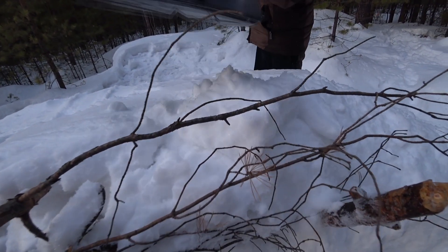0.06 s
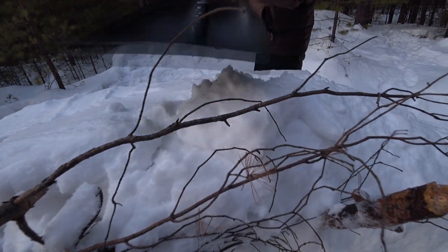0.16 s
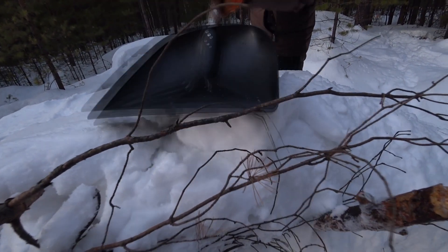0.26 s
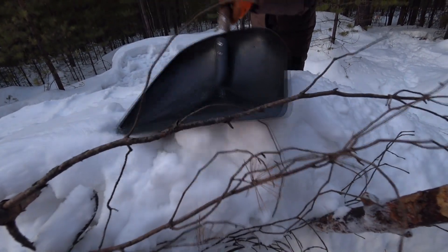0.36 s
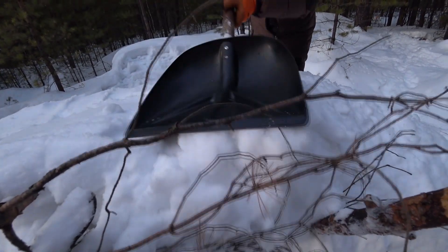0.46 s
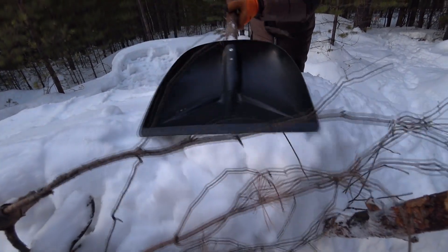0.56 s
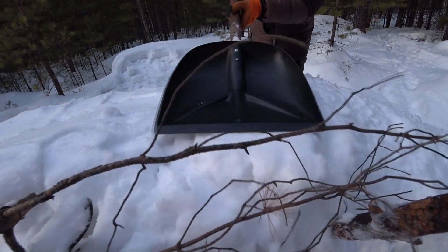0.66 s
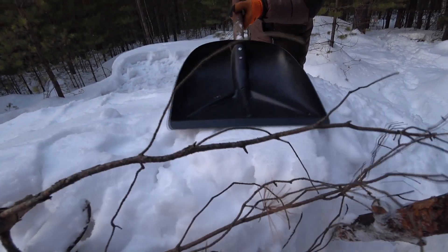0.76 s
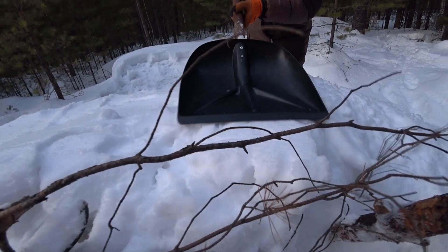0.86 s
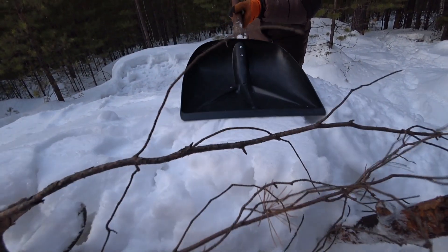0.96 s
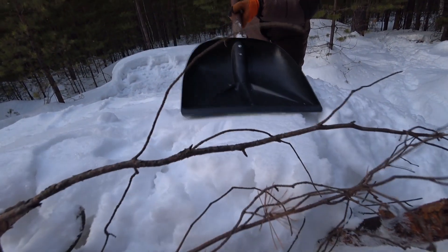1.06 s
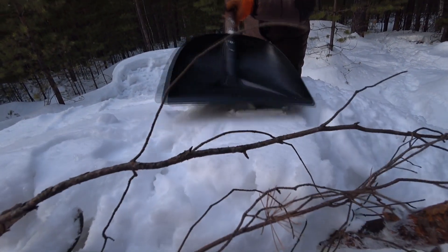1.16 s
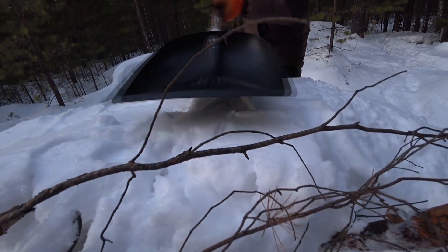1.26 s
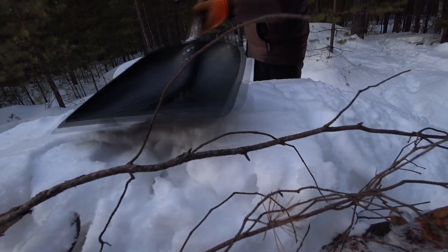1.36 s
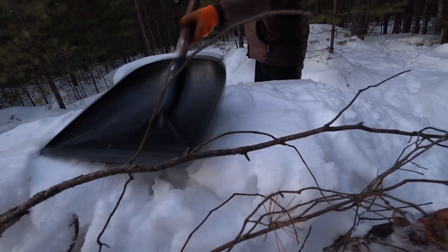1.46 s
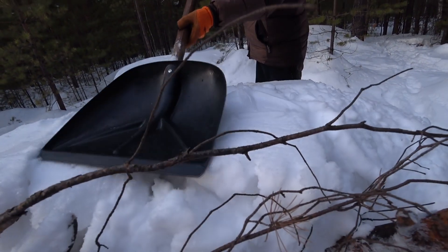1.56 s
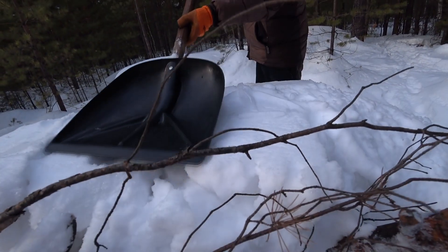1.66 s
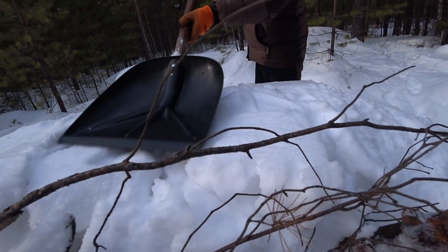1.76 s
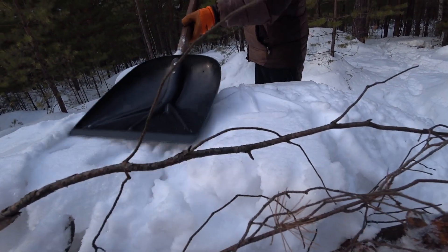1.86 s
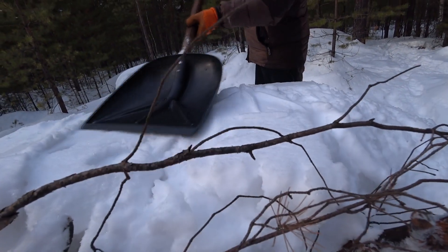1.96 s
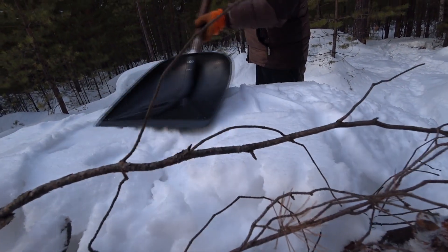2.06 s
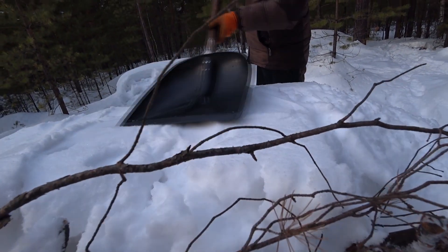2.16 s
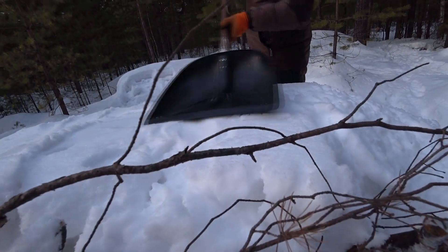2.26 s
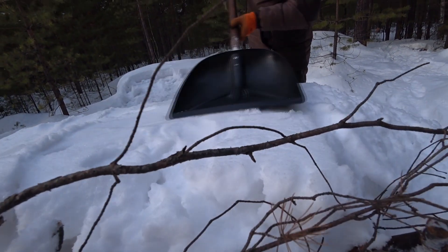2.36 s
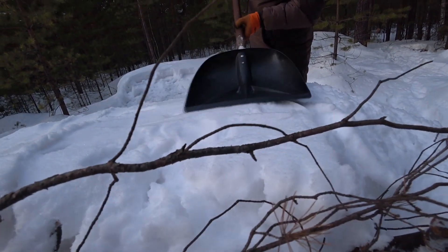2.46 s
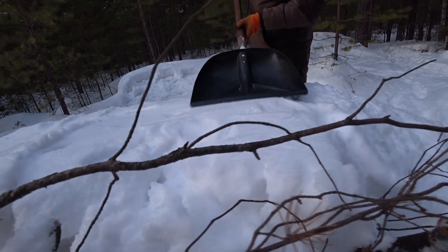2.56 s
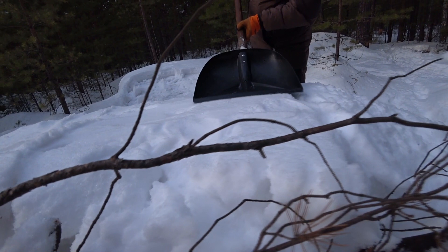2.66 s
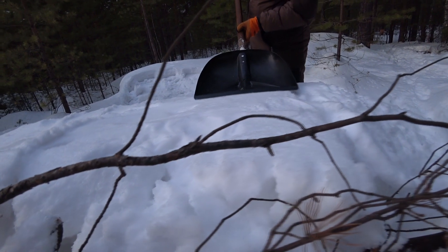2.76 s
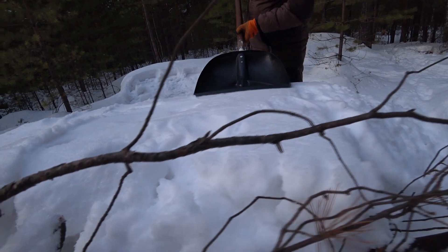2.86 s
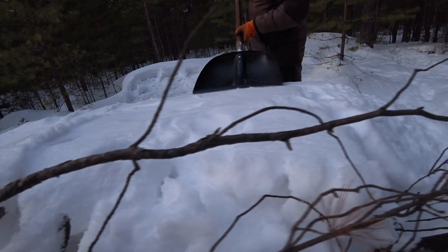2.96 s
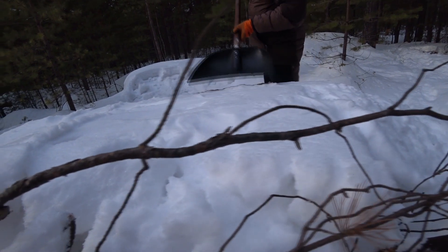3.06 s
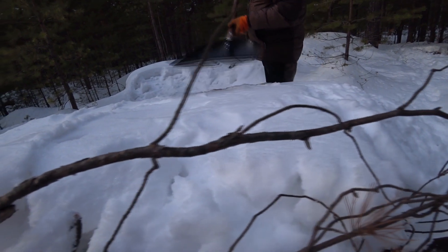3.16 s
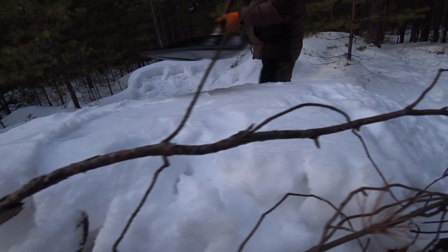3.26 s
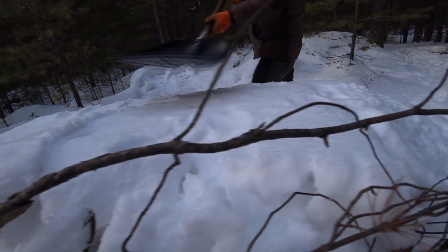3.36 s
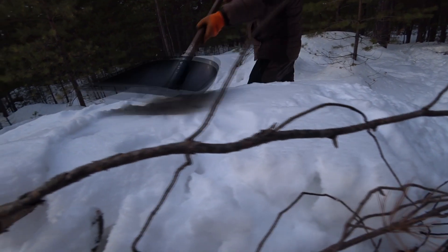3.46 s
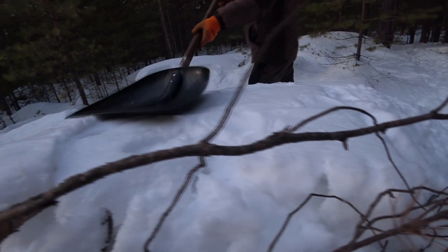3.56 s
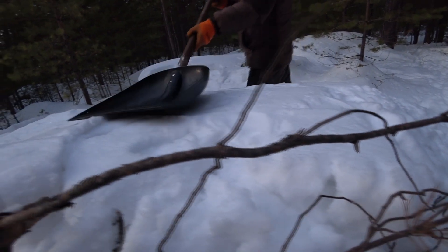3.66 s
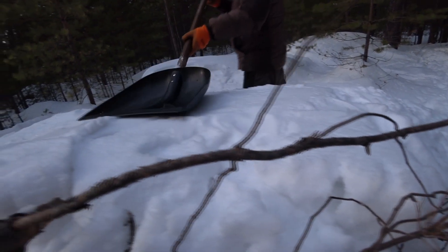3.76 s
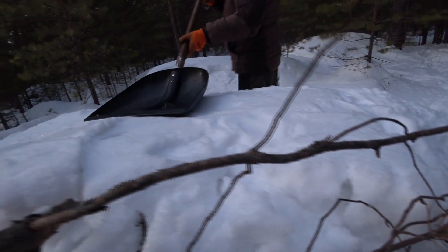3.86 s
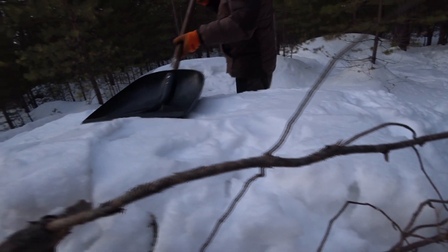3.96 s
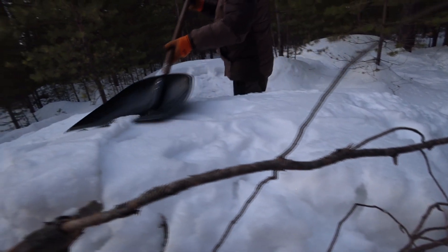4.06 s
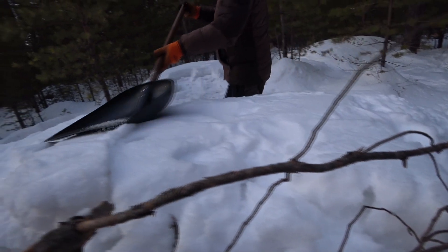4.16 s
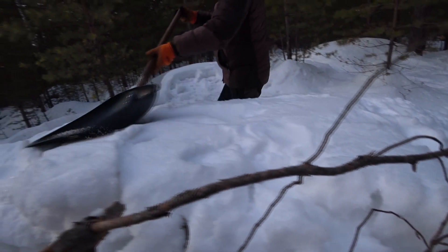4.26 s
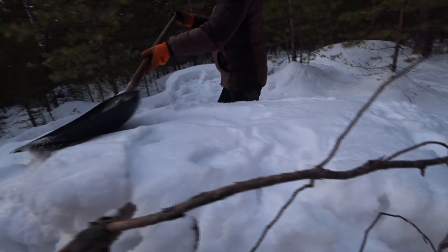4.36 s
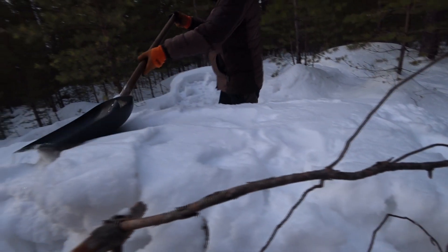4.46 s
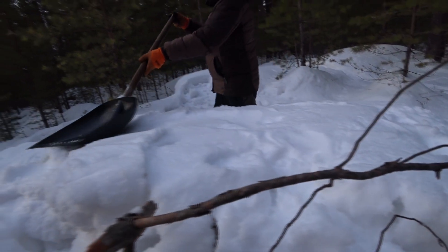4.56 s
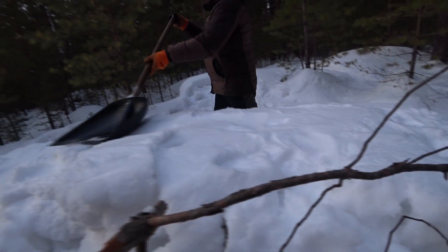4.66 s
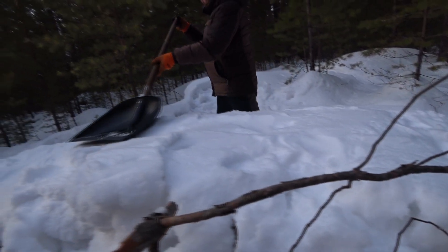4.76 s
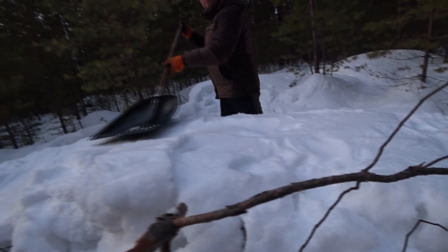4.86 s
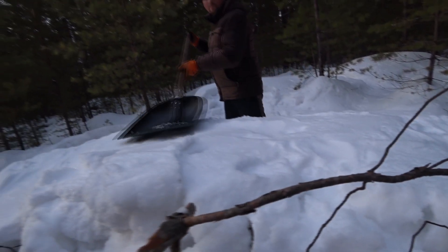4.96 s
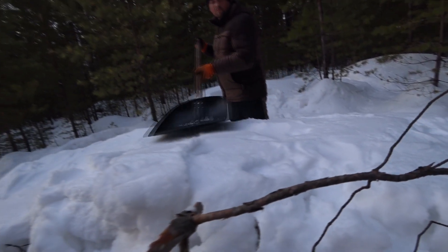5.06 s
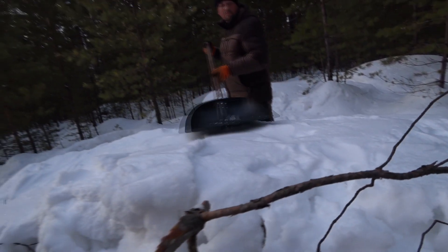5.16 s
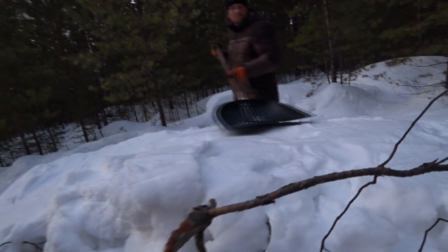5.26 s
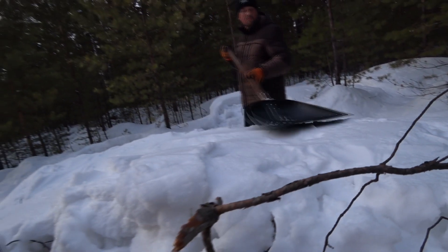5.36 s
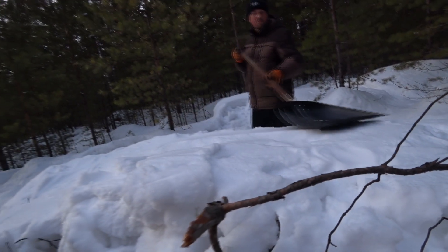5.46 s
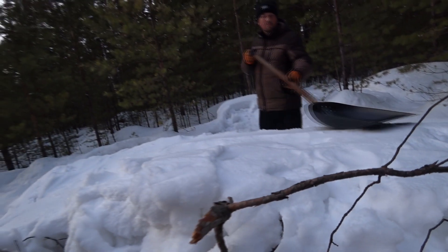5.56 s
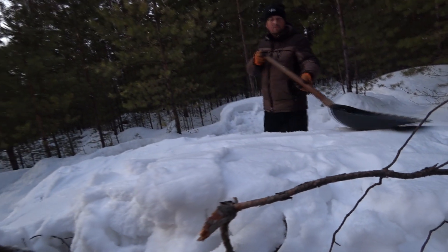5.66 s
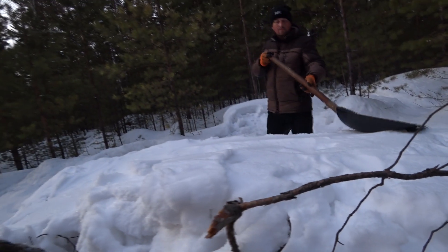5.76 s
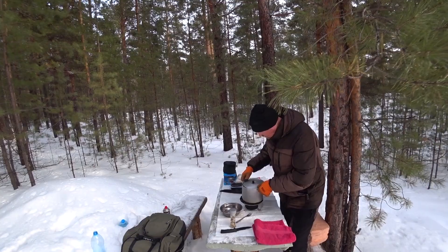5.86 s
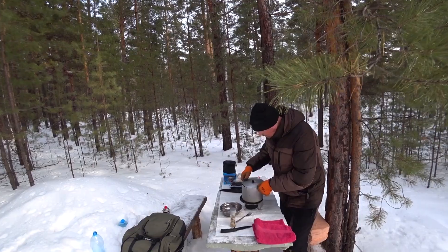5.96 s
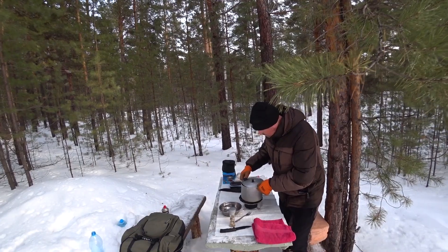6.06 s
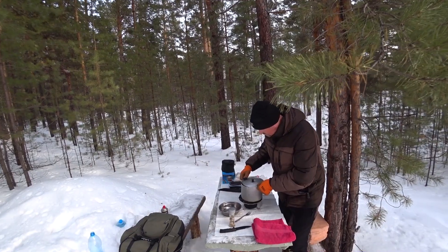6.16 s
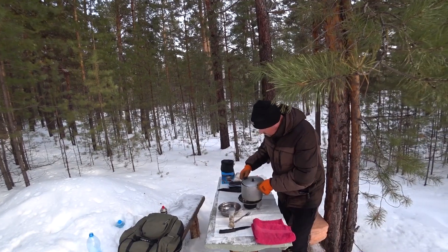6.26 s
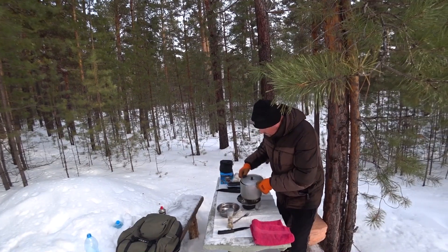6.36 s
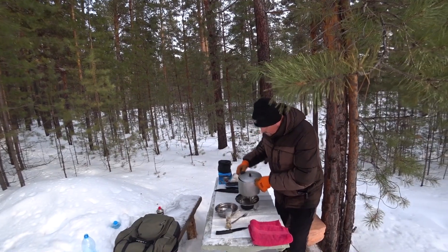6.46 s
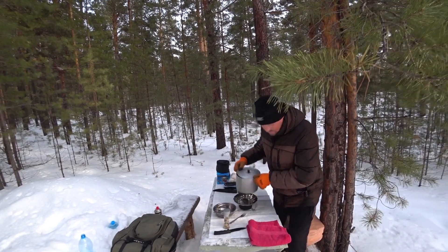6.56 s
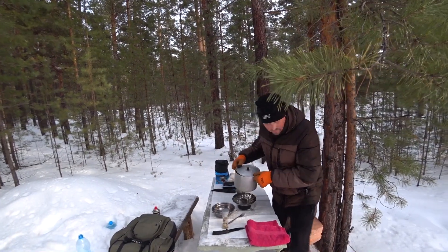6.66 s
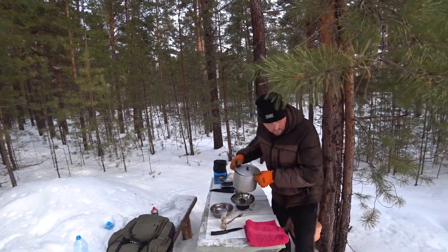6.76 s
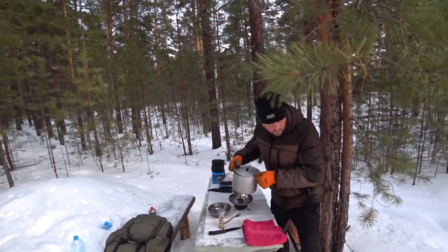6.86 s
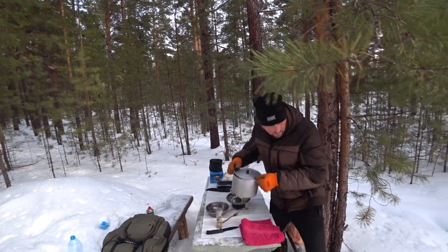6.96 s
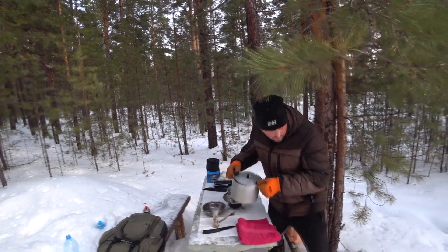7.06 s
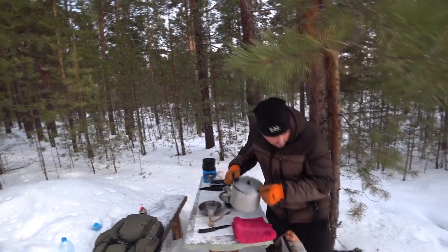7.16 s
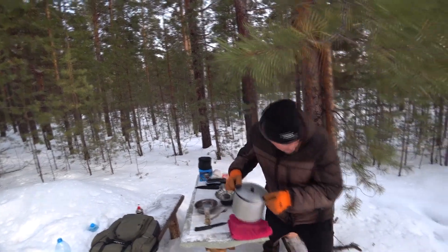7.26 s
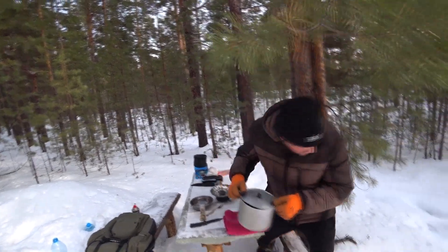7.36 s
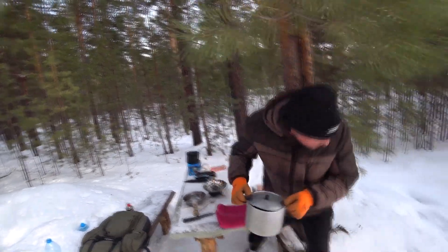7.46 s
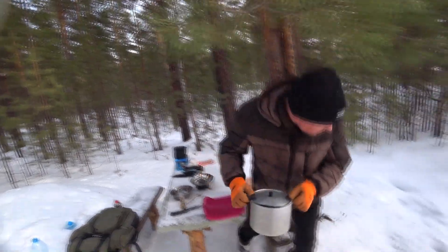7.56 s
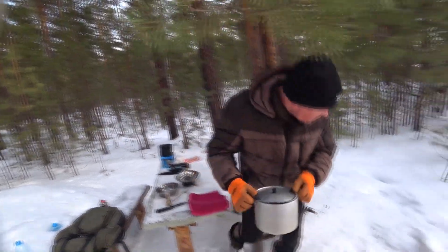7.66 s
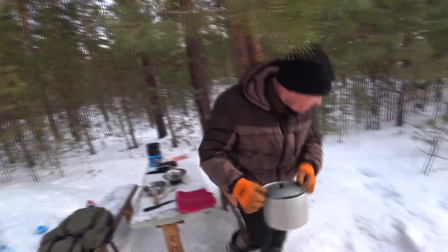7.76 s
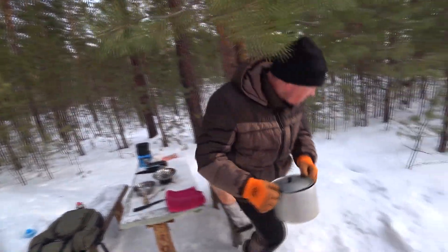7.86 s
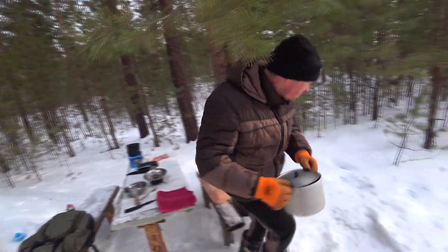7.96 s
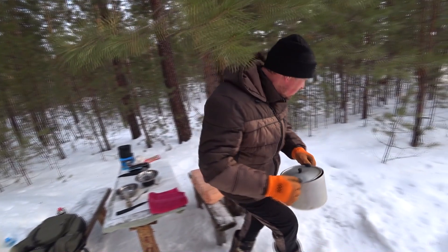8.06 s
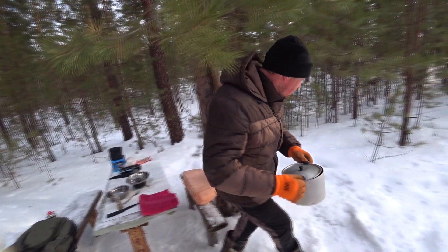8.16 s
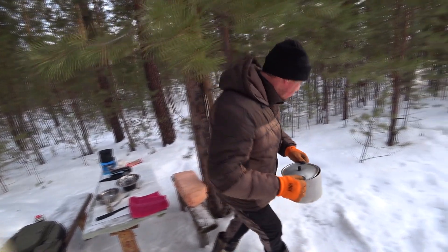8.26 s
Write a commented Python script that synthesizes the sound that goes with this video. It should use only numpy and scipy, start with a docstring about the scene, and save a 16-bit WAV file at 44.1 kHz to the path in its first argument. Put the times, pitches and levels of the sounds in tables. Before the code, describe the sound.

Dry, close stereo outdoor sound over a wide, faint hush. A shovel edge bites packed snow with a loud crunch, scrapes on, lifts with trickling crumbs, then stabs and scrapes twice more, the last stroke lighter. The scene changes to near quiet: soft glove rustle, small dull clinks on a pot, one hollow knock, then several quick crunchy footsteps, with only a trace of reflection from the trees.

```python
"""Snow shovel, then steps at a camp

A plastic shovel chops into packed snow and drags over it; crumbs trickle between strokes.
Tiny random fractures make the snow hiss and the blade rattle; single bigger ones make it knock.
Then, at a quiet forest camp, a pot rings as gloves handle it, and boots crunch through snow.
The background hush is filtered noise; blade and pot are sets of short resonances set ringing by clicks.
"""
import sys
import numpy as np
from scipy import signal
from scipy.fft import rfft, irfft
from scipy.io import wavfile
from scipy.ndimage import uniform_filter1d, map_coordinates

SR = 44100
rng = np.random.default_rng(int(sys.argv[2]) if len(sys.argv) > 2 else 0)


def master(y):
    """Save y as 16-bit WAV."""
    cut = np.clip(np.atleast_2d(y).T, -1, 1)
    pcm = np.round(cut * 32767)  # scale
    wavfile.write(sys.argv[1], SR, pcm.astype(np.int16))


N = 366912

# Levels in the tables are relative: each sound's function sets its overall level.
# background hush: (frequency [Hz], level per Hz [dB])
HUSH_SPECTRUM = [(40, -34), (85, -24), (160, -17.5), (230, -11), (320, -5), (480, -4.5), (1000, 0),
                 (1700, -2.5), (2700, -9.5), (5200, -13.5), (6500, -9.5), (8700, -21.5), (10100, -10.5),
                 (11000, -21)]
# how alike the background hush is at left and right, out of phase in the midrange:
# (frequency [Hz], correlation [-1 to 1])
HUSH_LIKENESS = [(60, .6), (250, 0.13), (500, -0.19), (1000, -0.68), (2000, -0.54), (4000, 0.13),
                 (10000, 0.15)]
# loose snow sliding off the lifted blade: (time [s], hold [s], level [dB])
TRICKLES = [(0.0, 0.011, -42.5), (0.112, 0.12, -51), (1.105, .22, -41.5), (1.378, .05, -48),
            (3.03, .5, -51.5)]
TRICKLE_ATTACK_S, TRICKLE_RELEASE_DB_PER_S = 0.0061, 110
# crumbs on the crust: (frequency [Hz], level per Hz [dB])
CRUMB_SPECTRUM = [(60, -32), (150, -20), (280, -11.5), (800, -26), (2200, -1.5), (4500, 1), (7000, 3.5),
                  (8800, -1), (11000, -3.5)]
# crust giving way under the blade:
# (time [s], knock level [dB], crack level [dB], centre [Hz], base length [s])
BIG_BREAKS = [(0.0557, -54, -30.5, 2730, .0023), (0.199, -45, -44, 600, .002),
              (0.2885, -10.5, -16, 1114, .0035), (0.3233, -18, -22, 1190, .004),
              (0.344, -21, -21, 2420, .006), (0.4232, -15.5, -30, 1140, .003),
              (0.4684, -16.5, -39, 1800, .0014), (0.5015, -17, -29.5, 1900, 0.0014),
              (0.768, -28.5, -32, 1080, 0.0025), (0.813, -24, -37, 1070, 0.0041),
              (0.8753, -30, -27, 1350, .004), (0.972, -26.5, -25, 1260, .0025),
              (1.47, -23.5, -21.5, 1900, .0034), (1.5386, -23.5, -38, 1980, 0.0011),
              (1.771, -23.5, -46, 1230, 0.0026), (1.815, -26.5, -36, 1340, 0.004),
              (2.0964, -27.5, -25, 1530, 0.0076), (2.1476, -22, -33, 1980, .0008),
              (2.1837, -10.5, -19.5, 1500, 0.0019), (2.29, -23, -21.5, 1780, 0.0061),
              (2.32, -22, -25, 1790, .002), (2.3452, -17.5, -22, 1380, .003), (2.491, -28, -36, 2900, .002),
              (2.5306, -16.5, -23, 1580, 0.0019), (2.573, -20.5, -29, 1550, 0.006),
              (2.647, -28, -28.5, 1380, 0.0043), (2.982, -25, -37, 1490, .007),
              (3.036, -44.5, -57, 900, 0.0008), (3.104, -42.5, -63, 930, 0.0013),
              (3.545, -33, -23.5, 2240, .0018), (3.5905, -27, -25.5, 2050, .0007),
              (3.628, -34, -36, 1790, 0.0012), (4.131, -26, -44, 1500, .005), (4.675, -22, -45, 1480, .022),
              (4.867, -30.5, -36, 2110, .005), (5.774, -45, -59, 696, .0027)]
# resonances of the plastic blade: (frequency [Hz], level [dB], time to fall 60 dB [s])
BLADE_MODES = [(243, -4, 0.032), (460, 0, 0.031), (582, -0.5, 0.036), (800, 1, 0.021), (888, 5, 0.012),
               (1140, 0.5, 0.018), (1325, 4, 0.01), (1610, 3.5, 0.015), (2010, 8, 0.0082), (2326, 0, 0.026),
               (3090, -15, 0.0087), (3980, -28, .015)]
# hissing ice crystals: (frequency [Hz], level per Hz [dB])
CRYSTAL_SPECTRUM = [(60, -47), (300, -36.5), (800, -31), (2000, -6.5), (3500, -6.5), (5000, -5), (6500, -3),
                    (7600, -4), (8800, -8), (10800, -6)]
# the three strokes: (time [s], force on the edge [dB], looseness: hiss over rattle [dB])
CHOP_STROKE = [(0.24, -51.5, 14), (0.28, -32.5, -0.5), (0.33, -19.5, -4.5), (0.39, -29.5, 0),
               (0.49, -24.0, -3), (0.64, -32.5, 2), (0.86, -29, -1), (1.03, -35.5, 0.0), (1.11, -49, 5.5)]
SCOOP_STROKE = [(1.58, -44, -2), (1.63, -32.5, 2), (2.07, -33.5, 0.5), (2.19, -28, 3.5),
                (2.35, -23.5, -0.5), (2.46, -34, 1.5), (2.53, -26, -1.5), (2.65, -31, -5.5),
                (2.73, -37.5, 1), (2.83, -29.5, -3.5), (2.99, -32, -6), (3.03, -49, -7)]
DRAG_STROKE = [(3.661, -44.5, -8.5), (3.79, -32.5, 2), (4.07, -37, 2), (4.14, -29, 2.5), (4.34, -36.5, -3),
               (4.46, -32.5, -1), (4.58, -35, -2.5), (4.68, -22.5, -7.0), (4.73, -30.5, -1),
               (4.89, -39.5, 1), (5.04, -36, 8.5), (5.13, -38.0, 4), (5.22, -33.5, 8), (5.69, -39, 1.5),
               (5.75, -50, 1.0), (5.88, -48.5, 2.5), (5.9, -70, -1.0)]
# the edge stabs in before the second and third strokes:
# (time [s], hold [s], force [dB], looseness [dB])
STABS = [(1.462, .075, -24.5, 0.5), (3.533, 0.027, -31.5, 8), (3.587, 0.0097, -33.5, -12)]
STAB_ATTACK_S, STAB_RELEASE_DB_PER_S = 0.0066, 338
# loose snow packs less than firm crust: dB of packing lost per dB of looseness
PACKING_LOSS = 0.1
# snow packing under the edge: (frequency [Hz], level per Hz [dB])
PACKING_SPECTRUM = [(30, -33), (90, -31), (150, -19.5), (220, -10.5), (350, 0.5), (560, 2.5), (700, 4),
                    (1000, -2), (2000, -61), (8000, -75)]
# blade rattle: (frequency [Hz], level per Hz [dB])
RATTLE_SPECTRUM = [(100, -48), (350, -35), (650, -10.5), (900, -4.5), (1300, 1), (1700, 1.5), (2400, -2.5),
                   (3100, -5.5), (4200, -5.5), (11000, -51)]
# small breaks come at random through the strokes; levels are relative to the edge force
CHIPS_PER_S = 11
CHIP_DB, CHIP_CRACK_DB = -2.5, -9
CHIP_CENTRE_HZ, CHIP_BASE_S = 1600, .002
# heavy pushes of blade or boot: (time [s], level [dB], pitch [Hz], time to fall 60 dB [s])
HEAVY_PUSHES = [(0.29, -16, 570, 0.043), (0.291, -39, 232, 0.055), (2.182, -47, 75, 0.028),
                (2.53, -27.5, 545, 0.051), (3.952, -45, 267, 0.016), (7.796, -53, 125, 0.044)]
# crumbs landing, handling ticks and snow snapping under boots:
# (time [s], thud level [dB], crack level [dB], base length [s])
SMALL_SNAPS = [(1.118, -47, -37, 0.0025), (3.297, -47.5, -44.5, .002), (3.391, -47, -45.5, .002),
               (6.068, -51, -70, .0023), (6.111, -51, -70, .003), (6.422, -45, -62, .0013),
               (6.852, -61, -49, .002), (6.921, -50, -42, 0.0022), (7.1916, -31.5, -29.5, .005),
               (7.274, -41, -35.5, 0.0043), (7.4103, -38.5, -40, 0.0022), (7.436, -38.5, -37, 0.0038),
               (7.548, -35, -35, 0.005), (7.5983, -36.5, -43, 0.0048), (7.692, -47, -48, .0014),
               (7.924, -37.5, -43, .003), (7.6461, -27.5, -39.5, 0.0036), (7.797, -29, -31, 0.0028),
               (7.8643, -32, -39, 0.0055), (8.034, -37, -36, .0036), (8.0985, -31, -29.5, .0012),
               (8.1243, -39, -27.5, 0.0016), (8.255, -35, -29, 0.0019)]
# low part of boots and soft handling: (frequency [Hz], level per Hz [dB])
BOOT_SPECTRUM = [(30, -59), (90, -19), (200, -9), (420, -2.5), (800, -0.5), (1250, 1.5), (1900, -2),
                 (3000, -1), (5000, -6), (11000, -24)]
# fine, dry crunch: (frequency [Hz], level per Hz [dB])
CRUNCH_SPECTRUM = [(200, -29), (1000, -16), (2500, -8.5), (4000, -10), (6000, -1.5), (7500, -3.5),
                   (8800, -11), (11000, -13)]
# bands of the camp hum: (centre [Hz], width of one filter pass [Hz], level [dB])
CAMP_BANDS = [(303, 41, -8), (401, 52, -4), (499, 36, 0.5), (755, 320, 3), (923, 77, 4), (1430, 440, 1.5)]
# gloves rubbing on the pot: (time [s], hold [s], level [dB])
GLOVE_RUBS = [(6.4, .04, -44), (6.58, 0.015, -58.5), (6.78, .22, -58), (7.055, 0, -44)]
RUB_ATTACK_S, RUB_RELEASE_DB_PER_S = 0.07, 56
# lid and handles tapping the pot: (time [s], level [dB])
POT_TAPS = [(6.514, -38.5), (6.535, -27.5), (6.577, -47)]
# resonances of the pot, damped by gloves: (frequency [Hz], level [dB], time to fall 60 dB [s])
POT_MODES = [(930, 2, 0.016), (1308, 2, 0.02), (1700, 1, 0.035), (3418, -9, 0.016), (3780, -9, .1),
             (5620, -9, 0.023), (6570, -4, 0.015), (7200, -6, .02)]
# boots pressing the snow: (time [s], hold [s], crunch level [dB], hiss level [dB])
FOOT_PRESSES = [(7.18, 0.047, -38.5, -39), (7.3, 0.0092, -44, -44), (7.358, 0.11, -50, -48.5),
                (7.488, 0.065, -43.5, -39), (7.854, 0.014, -35, -35), (7.915, 0.0059, -39, -37),
                (7.949, 0.012, -46.5, -51), (8.016, 0.13, -38.5, -35.5), (8.18, 0.023, -38.5, -35.5),
                (8.219, .09, -33, -35)]
TREAD_ATTACK_S, TREAD_RELEASE_DB_PER_S = .012, 480
# where shovel and boots are: (time [s], left over right [dB])
POSITIONS = [(0.0, -8), (0.07, -5.5), (0.14, -0.5), (1.13, -2.5), (1.62, 1.5), (2.73, -2), (4.7, 3.5),
             (5.65, -5), (5.88, -7), (5.93, -4.5), (7.16, 1.5), (7.21, -4), (7.37, -1.5), (8.32, -2)]
LEAD_S = .012  # how long fractures gather before a snap
CEILING = .88  # loudest sample the recorder can take
TOP_HZ = 11080  # upper band limit of the recorder


def amp(db):
    """Turn decibels into a gain."""
    return np.exp(np.asarray(db) * (np.log(10) / 20))


def unit(x):
    """Scale x to an average strength (rms) of 1."""
    return x / np.sqrt(np.mean(x ** 2) + 1e-20)


def blow(x):
    """Give a short sound the energy of 10 ms at rms 1."""
    return x / np.linalg.norm(x) * np.sqrt(SR / 100)


def add(track, s, sound):
    """Mix a sound into the track at time s."""
    part = track[max(round(s * SR), 0):][:len(sound)]
    part += sound[:len(part)]


def along(points, hz):
    """Read (Hz, value) points on a log frequency axis."""
    f, v = np.transpose(points)
    return np.interp(np.log(hz + 1), np.log(f), v)


def wobble(rate):
    """Draw a smooth random curve through a given number of knots a second."""
    step = 16  # samples between computed points
    coarse = np.arange(0, N + step, step)
    knots = rng.standard_normal(N // 60)
    curve = map_coordinates(knots, [coarse * rate / SR], order=2, mode="wrap")
    return np.interp(np.arange(N), coarse, curve)


def swell(s, attack, hold, release_db_per_s):
    """Shape a level from time s: rise, hold, then a steady fall in dB."""
    track, t = np.zeros(N), np.arange(SR) / SR
    rise = np.clip(t / attack, 0, 1)
    fall = amp(-release_db_per_s * np.maximum(t - attack - hold, 0))
    add(track, s, rise * fall)
    return track


def colour(x, spectrum):
    """Filter x to a spectrum, with no sound before a click, so clicks keep their sharp fronts."""
    size = 4096
    # folding the cepstrum forward in time gives a minimum-phase filter
    cepstrum = irfft(np.log(amp(along(spectrum, np.fft.rfftfreq(size, 1 / SR)))))
    cepstrum[1:size // 2] *= 2
    cepstrum[size // 2 + 1:] = 0
    response = irfft(np.exp(rfft(cepstrum)))
    return signal.oaconvolve(x, response)[:len(x)]


def focus(x, hz, q):
    """Pass x through one resonance at hz; a higher q is sharper."""
    return signal.lfilter(*signal.iirpeak(hz, max(q, .3), SR), x)


def grit(rate, spread_db, size=N):
    """Make tiny fractures: random clicks, rate a second, of widely spread sizes."""
    hits = np.flatnonzero(rng.random(size) < rate / SR)
    spread, sign = rng.standard_normal((2, len(hits)))
    track = np.zeros(size)
    track[hits] = amp(spread_db * np.clip(spread, -2, 2)) * np.sign(sign)
    return unit(track)


def patchy(x, depth_db):
    """Shift the colour from moment to moment as the contact moves."""
    z = signal.stft(x, nperseg=512)[2]
    field = uniform_filter1d(rng.standard_normal(z.shape), size=6, axis=0)
    field = uniform_filter1d(field, size=10, axis=1)
    return unit(signal.istft(z * amp(depth_db * unit(field)))[1][:N])


def burst(length, rate, snap=1):
    """Fractures gather for a moment, peak in a snap at LEAD_S and die away."""
    t = np.arange(SR // 10) / SR - LEAD_S
    u = t / max(length, .0005)
    run = grit(rate, spread_db=1.0, size=len(t)) * np.exp(-np.maximum(u, -2.5 * u))
    click = np.arange(len(t)) == round(LEAD_S * SR)
    return run / (np.linalg.norm(run) + 1e-9) + snap * click


def background_hush(level_db=-48.0):
    """A wide, nearly steady hush is filtered noise, its midrange partly opposite in phase left and right."""
    hz = np.fft.rfftfreq(N, 1 / SR)
    turn = np.arccos(np.clip(along(HUSH_LIKENESS, hz), -1, 1)) / 2
    noise = rfft(rng.standard_normal((2, N))) * amp(along(HUSH_SPECTRUM, hz))
    mid, side = irfft(noise * [np.cos(turn), np.sin(turn)], N)
    hush = unit(np.array([mid + side, mid - side]))
    return amp(level_db + 0.61 * wobble(5)) * hush * amp([[-1], [1]])


def trickle(level_db=-1):
    """Loose crystals patter down on the crust as many small clicks."""
    patter = grit(7000, spread_db=7.0) * amp(0.6 * wobble(76))
    flow = sum(amp(db) * swell(s, TRICKLE_ATTACK_S, hold, TRICKLE_RELEASE_DB_PER_S)
               for s, hold, db in TRICKLES)
    return amp(level_db) * flow * unit(colour(patter, CRUMB_SPECTRUM))


def blade(x, weights_db):
    """The blade's resonances answer x; the contact point gives each a weight."""
    out = 0
    for (hz, db, t60), weight_db in zip(BLADE_MODES, weights_db):
        q = np.pi * hz * t60 / np.log(1000)
        out = out + amp(db + weight_db) * t60 * focus(x, hz, q)
    return out


def breaks(rows, knock_db=-0.5, crack_db=2.5, focus_q=3.26):
    """A fracture cracks and kicks the blade, which rings briefly."""
    track = np.zeros(N)
    for s, low_db, high_db, hz, length in rows:
        kick = burst(1.46 * length, rate=9900, snap=0.53)
        ring = blade(kick, rng.normal(0, 2.1, len(BLADE_MODES)))
        knock = blow(focus(ring, hz, focus_q))
        crack = blow(colour(burst(1.1 * length, rate=18000, snap=0.031), CRYSTAL_SPECTRUM))
        both = amp(low_db + knock_db) * knock + amp(high_db + crack_db) * crack
        add(track, s - LEAD_S, both)
    return track


def stroke(rows, fade=0.018):
    """Draw a stroke's force (a gain, zero outside it) and looseness (dB) over time."""
    t = np.arange(N) / SR
    s, force_db, loose_db = np.transpose(rows)
    gate = np.clip(np.minimum(t - s[0], s[-1] - t) / fade + .5, 0, 1)
    return gate * amp(np.interp(t, s, force_db)), np.interp(t, s, loose_db)


def contact(stab_packing_db=-6):
    """Force drives packing, rattle and hiss; looser snow hisses more, stabs cut more than they pack."""
    drags = [stroke(rows) for rows in (CHOP_STROKE, SCOOP_STROKE, DRAG_STROKE)]
    stabs = [(amp(db) * swell(s, STAB_ATTACK_S, hold, STAB_RELEASE_DB_PER_S), loose_db)
             for s, hold, db, loose_db in STABS]
    packing = sum(force * amp(-PACKING_LOSS * loose_db) for force, loose_db in drags)
    packing = packing + amp(stab_packing_db) * sum(force for force, _ in stabs)
    rattle = sum(force for force, _ in drags + stabs)
    hiss = sum(force * amp(loose_db) for force, loose_db in drags + stabs)
    return packing, rattle, hiss


def scrapes(packing, rattle, hiss, packing_db=-14, rattle_db=-3, ring_db=-4, hiss_db=2, wander_db=3):
    """The edge sticks and slips: each slip packs snow, shakes the blade and sheds crystals."""
    slips = 1.2 * wobble(70) + 1.4 * wobble(300)  # dB
    lumps = grit(2600, spread_db=4.5) * amp(slips)
    grains = grit(3200, spread_db=4.5) * amp(slips)
    crystals = grit(14000, spread_db=4.5) * amp(.7 * slips)
    pressed = grit(2500, spread_db=0) * amp(slips)
    push = unit(colour(patchy(pressed, depth_db=1.5), PACKING_SPECTRUM))
    # the contact wanders along the edge, so the blade's resonances take turns
    weights_db = [wander_db * wobble(22) for _ in BLADE_MODES]
    ring = unit(blade(colour(lumps, RATTLE_SPECTRUM), weights_db))
    rasp = unit(colour(patchy(grains, depth_db=2.5), RATTLE_SPECTRUM))
    fine = unit(colour(patchy(crystals, depth_db=1.5), CRYSTAL_SPECTRUM))
    shaken = amp(rattle_db) * rasp + amp(ring_db) * ring
    return amp(packing_db) * packing * push + rattle * shaken + amp(hiss_db) * hiss * fine


def spray(hiss, level_db=-10.5):
    """Crystals fly off both corners of the blade; opposite signs left and right widen the hiss."""
    side = amp(level_db) * hiss * unit(colour(grit(14000, spread_db=3), CRYSTAL_SPECTRUM))
    return np.array([side, -side])


def chips(force, scatter_db=3.5, scatter_octaves=0.85):
    """List small breaks at random times, with levels scattered around the force of the moment."""
    start, end = CHOP_STROKE[0][0], DRAG_STROKE[-1][0]
    chance = rng.random((round(CHIPS_PER_S * (end - start)), 3))
    rows = []
    for when, size, pitch in chance:
        s = start + when * (end - start)
        force_db = 20 * np.log10(force[int(s * SR)] + 1e-6)
        db = force_db + CHIP_DB + scatter_db * (2 * size - 1)
        hz = CHIP_CENTRE_HZ * 2 ** (scatter_octaves * (2 * pitch - 1))
        rows.append((s, db, db + CHIP_CRACK_DB, hz, CHIP_BASE_S))
    return rows


def thumps(level_db=-1):
    """Heavy pushes give one low, quickly damped swing."""
    track, t = np.zeros(N), np.arange(SR // 10) / SR
    for s, db, hz, t60 in HEAVY_PUSHES:
        soft_start = 1 - np.exp(-2 * hz * t)
        swing = np.sin(2 * np.pi * hz * t) * amp(-60 * t / t60) * soft_start
        add(track, s, amp(db + level_db) * blow(focus(swing, hz, q=0.52)))
    return track


def snaps(thud_db=0, crack_db=0, centre_hz=1250):
    """Single small collapses give a dull thud and a crack, with no blade ring."""
    track = np.zeros(N)
    for s, low_db, high_db, length in SMALL_SNAPS:
        push = colour(burst(1.44 * length, rate=9000, snap=0.17), BOOT_SPECTRUM)
        thud = blow(1.4 * push + focus(push, centre_hz, q=1.2))
        crack = blow(colour(burst(2.2 * length, rate=10000, snap=0.16), CRUNCH_SPECTRUM))
        both = amp(low_db + thud_db) * thud + amp(high_db + crack_db) * crack
        add(track, s - LEAD_S, both)
    return track


def camp(level_db=-50, width_db=4, waver_db=2, start_s=5.895):
    """At the camp a faint, hollow hum wavers in a few bands of filtered noise."""
    noise = rng.standard_normal((2, N))
    bands = []
    for hz, width, db in CAMP_BANDS:
        band = focus(focus(noise, hz, hz / width), hz, hz / width)
        bands.append(amp(db + waver_db * wobble(6.7)) * unit(band))
    mid, side = sum(bands)
    hum = unit(np.array([mid + amp(width_db) * side, mid - amp(width_db) * side]))
    return amp(level_db) * hum * (np.arange(N) / SR > start_s)


def pot_ring(x):
    """The pot's resonances answer x."""
    return sum(amp(db) * t60 * focus(x, hz, np.pi * hz * t60 / np.log(1000))
               for hz, db, t60 in POT_MODES)


def pot(ring_db=-7, click_db=-4, body_db=-3, sing_db=-7, cloth_db=-2, hiss_db=-3):
    """Gloves rustle on the pot and make it sing faintly; lid and handles clink against it."""
    grip = sum(amp(db) * swell(s, RUB_ATTACK_S, hold, RUB_RELEASE_DB_PER_S)
               for s, hold, db in GLOVE_RUBS)
    rub = grit(7000, spread_db=3) * amp(1.8 * wobble(45))
    sing = amp(sing_db) * unit(pot_ring(rub))
    cloth = amp(cloth_db) * unit(colour(grit(5000, spread_db=2.5), BOOT_SPECTRUM))
    hiss = amp(hiss_db) * unit(colour(rub, CRUNCH_SPECTRUM))
    track = grip * (sing + cloth + hiss)
    for s, db in POT_TAPS:
        tap = burst(length=0.0012, rate=16000, snap=2.5)
        ring = amp(ring_db) * blow(pot_ring(tap))
        click = amp(click_db) * blow(colour(tap, CRUNCH_SPECTRUM))
        body = amp(body_db) * blow(colour(tap, BOOT_SPECTRUM))
        add(track, s - LEAD_S, amp(db) * (ring + click + body))
    return track


def bump(s=7.139, level_db=-12, rub_db=-23, tick_db=-35, hz=890):
    """A short rub, then a hollow knock, in opposite phase left and right; its tick is centred."""
    track, centre = np.zeros((2, N))
    hit = colour(burst(length=0.0015, rate=11000, snap=1), BOOT_SPECTRUM)
    knock = blow(focus(focus(hit, hz, q=6), hz, q=.5))
    tick = blow(colour(burst(length=.002, rate=12000, snap=.2), BOOT_SPECTRUM))
    rubbing = colour(burst(length=0.015, rate=10000, snap=0), BOOT_SPECTRUM)
    rub = blow(focus(rubbing, hz=990, q=7))
    add(track, s - .025 - LEAD_S, amp(rub_db) * rub)
    add(track, s - LEAD_S, amp(level_db) * knock)
    add(centre, s - LEAD_S, amp(tick_db) * tick)
    return track * np.array([amp([-1.3]), -amp([1.3])]) + centre


def tread(crunch_db=0.5, hiss_db=0):
    """Snow packs down under a boot in clumps of dry, fine fractures."""
    crunch = hiss = 0
    for s, hold, low_db, high_db in FOOT_PRESSES:
        weight = swell(s, TREAD_ATTACK_S, hold, TREAD_RELEASE_DB_PER_S)
        crunch = crunch + amp(low_db) * weight
        hiss = hiss + amp(high_db) * weight
    clumps = 1.0 * wobble(110) + 1.5 * wobble(400)  # dB
    low = unit(colour(grit(3500, spread_db=4) * amp(clumps), BOOT_SPECTRUM))
    high = unit(colour(grit(7000, spread_db=5) * amp(clumps), CRUNCH_SPECTRUM))
    return amp(crunch_db) * crunch * low + amp(hiss_db) * hiss * high


def outdoors(x, near_db=-12, trees_db=-27, near_t60=0.025, trees_t60=0.32):
    """Close scatter widens the sound; the trunks return a faint tail."""
    t = np.arange(SR // 2) / SR
    near = rng.standard_normal(len(t)) * amp(-60 * t / near_t60)
    trees = rng.standard_normal((2, len(t))) * amp(-60 * t / trees_t60)
    # scatter shifts the phase between the ears and leaves their levels equal
    side = irfft(rfft(x) * 1j * unit(rfft(near, N).imag), N)
    tail = signal.fftconvolve(x[None], trees / np.linalg.norm(trees[0]), axes=1)[:, :N]
    return x + amp(near_db) * side * [[1], [-1]] + amp(trees_db) * tail


def scene():
    """Shovel and boots move a little across the front, over a wide background hush."""
    lean_db = np.interp(np.arange(N) / SR, *np.transpose(POSITIONS)) / 2
    packing, rattle, hiss = contact()
    shovel = scrapes(packing, rattle, hiss) + breaks(BIG_BREAKS) + thumps() + trickle()
    small_breaks = breaks(chips(rattle))
    walker = tread() + snaps() + pot()
    around = bump() + background_hush() + camp()
    near = outdoors(shovel + walker + small_breaks) + spray(hiss)
    return near * amp([lean_db, -lean_db]) + around


def record(dry, low_cut_hz=45):
    """The recorder clips peaks above its ceiling, thins deep bass and cuts steeply above its band limit."""
    hz = np.fft.rfftfreq(N, 1 / SR)
    bass = 1j * hz / (low_cut_hz + 1j * hz)
    top = amp(-np.clip((hz - TOP_HZ) / 8, 0, 100))  # 1 dB less every 8 Hz, down to -100 dB
    return irfft(rfft(np.clip(dry, -CEILING, CEILING)) * bass * top, N)


dry = scene()
out = record(dry)
master(out)
```